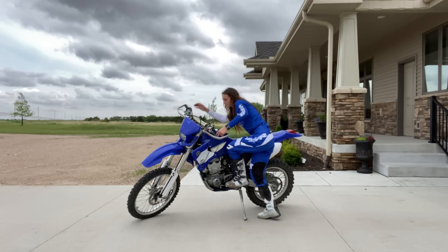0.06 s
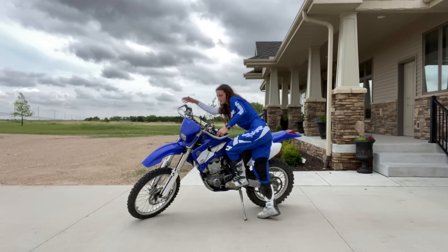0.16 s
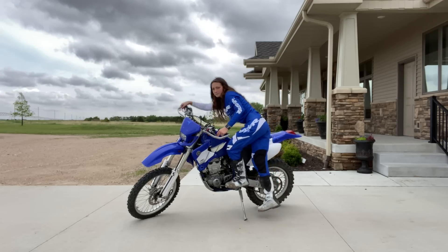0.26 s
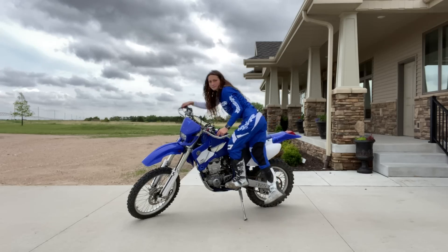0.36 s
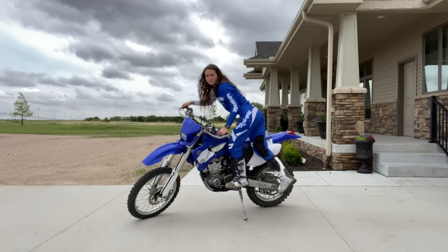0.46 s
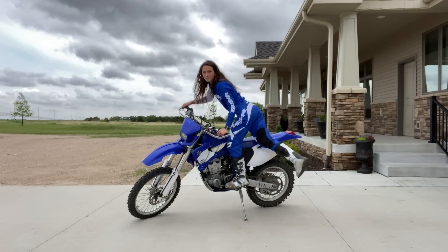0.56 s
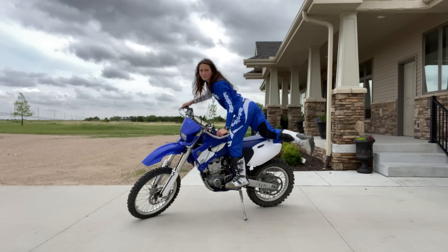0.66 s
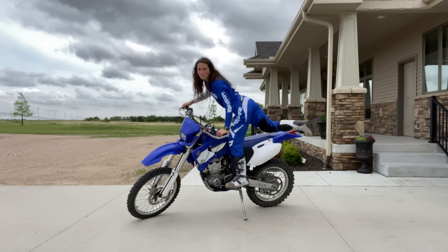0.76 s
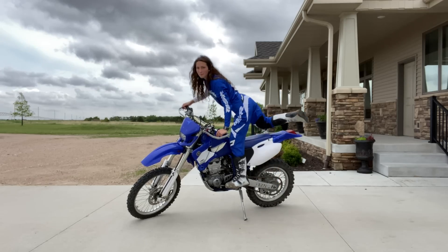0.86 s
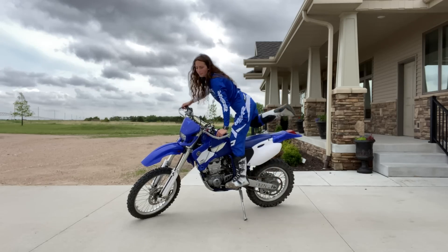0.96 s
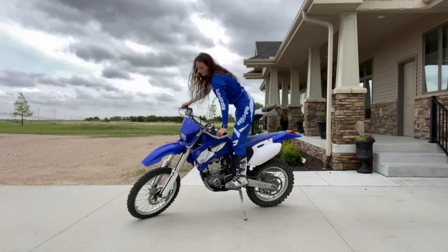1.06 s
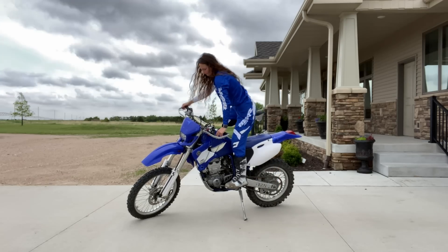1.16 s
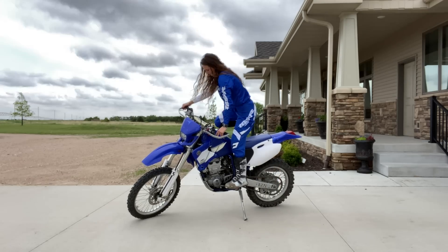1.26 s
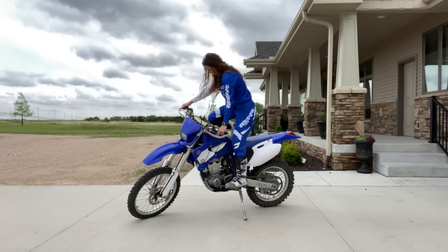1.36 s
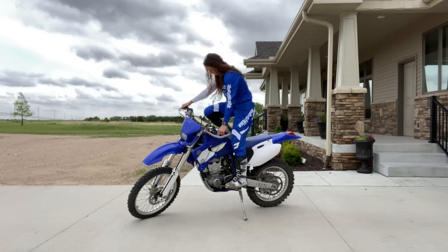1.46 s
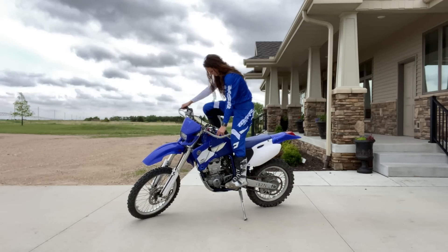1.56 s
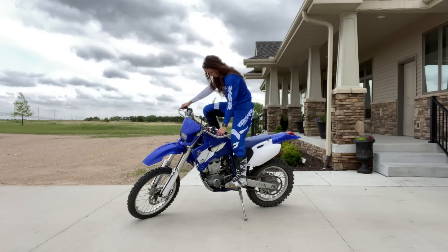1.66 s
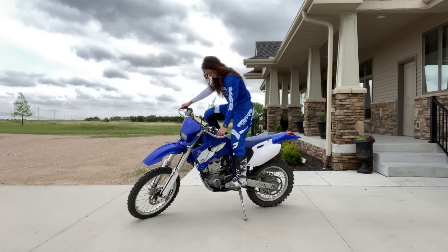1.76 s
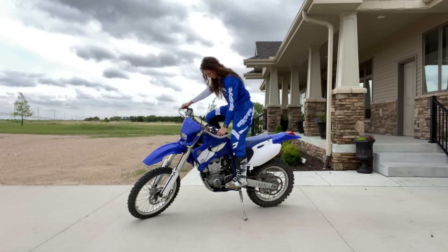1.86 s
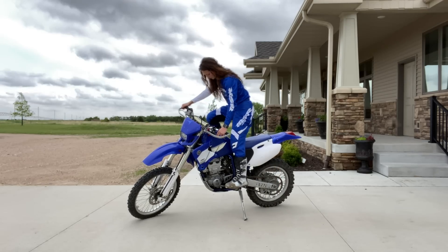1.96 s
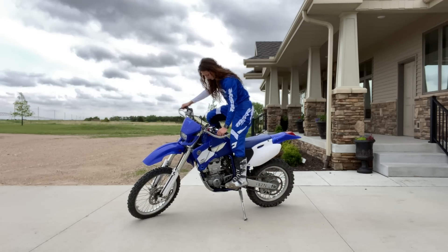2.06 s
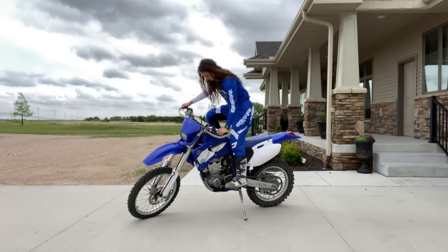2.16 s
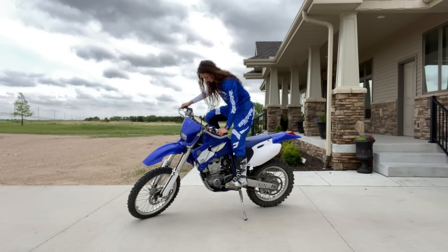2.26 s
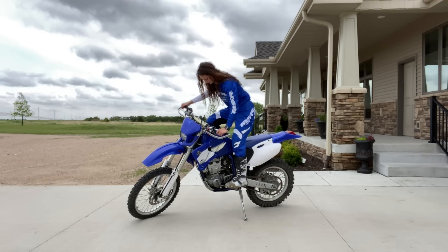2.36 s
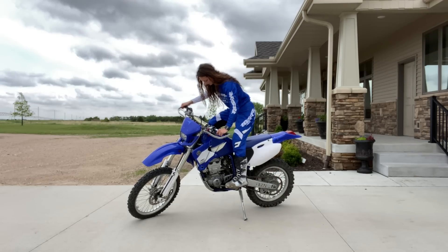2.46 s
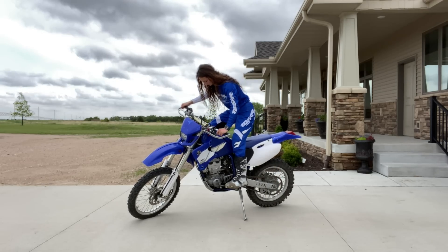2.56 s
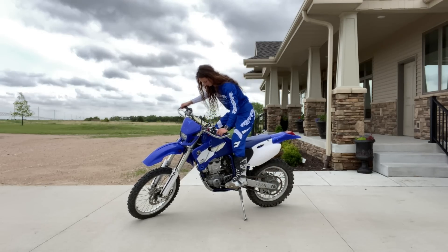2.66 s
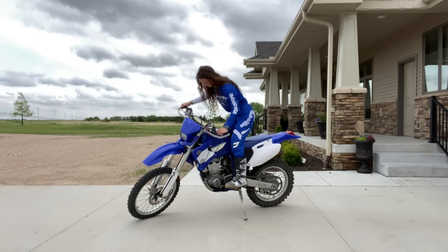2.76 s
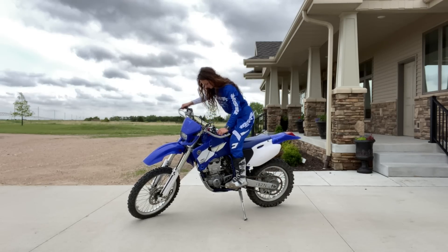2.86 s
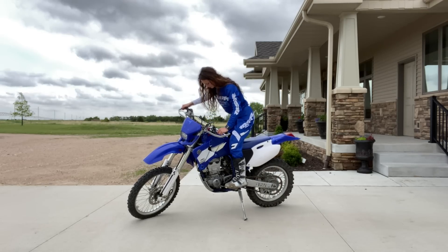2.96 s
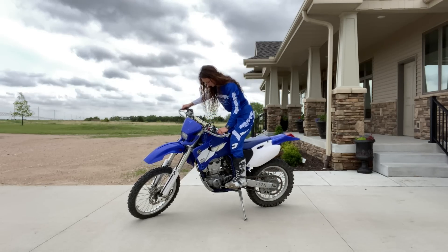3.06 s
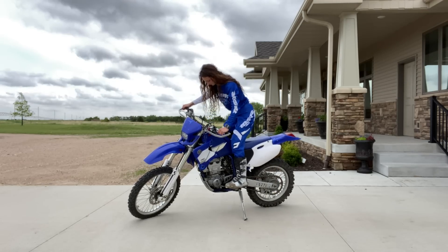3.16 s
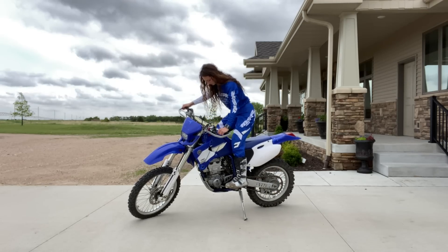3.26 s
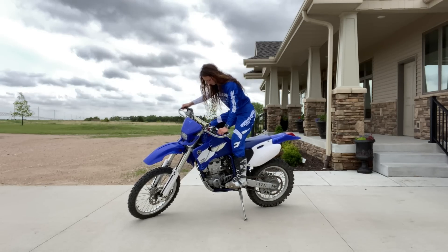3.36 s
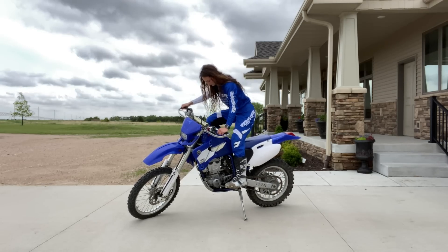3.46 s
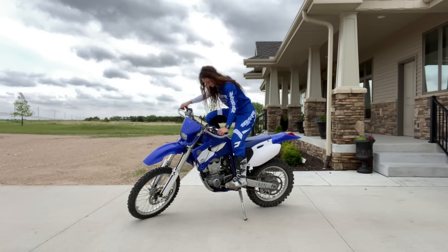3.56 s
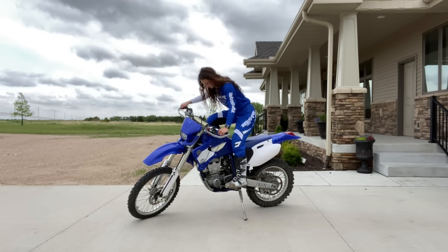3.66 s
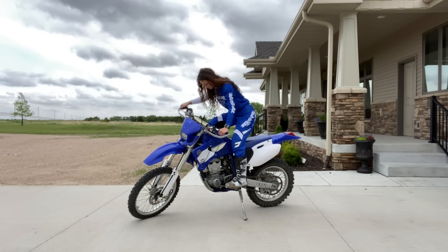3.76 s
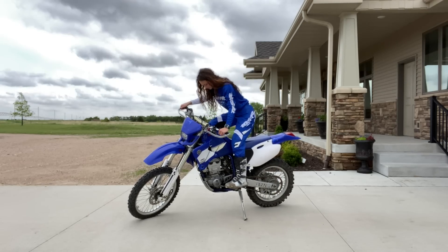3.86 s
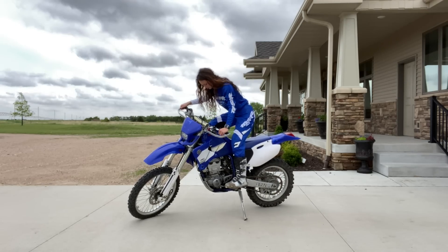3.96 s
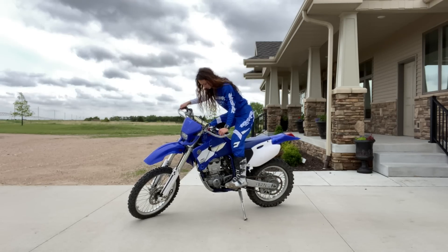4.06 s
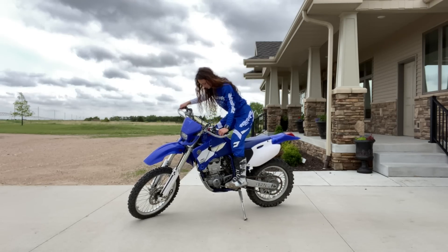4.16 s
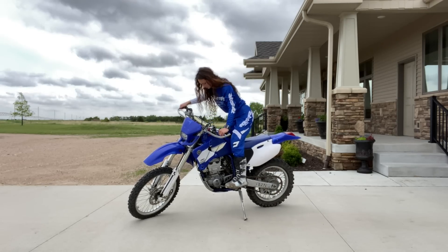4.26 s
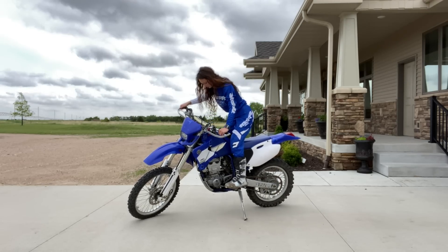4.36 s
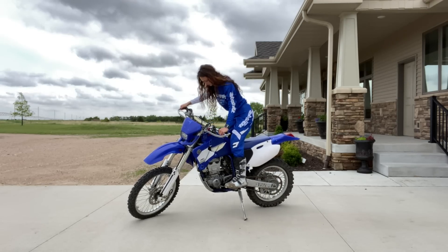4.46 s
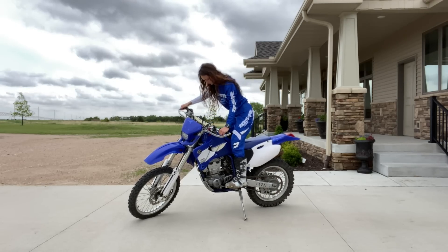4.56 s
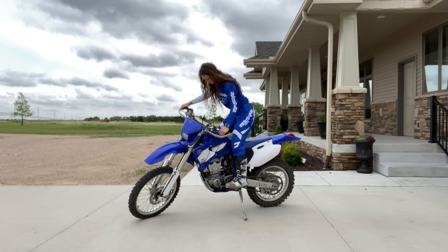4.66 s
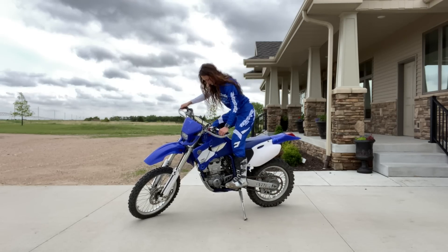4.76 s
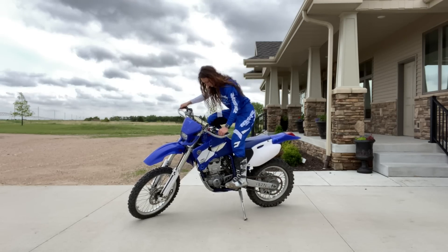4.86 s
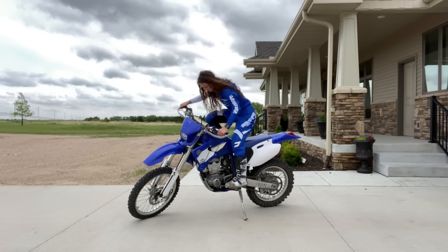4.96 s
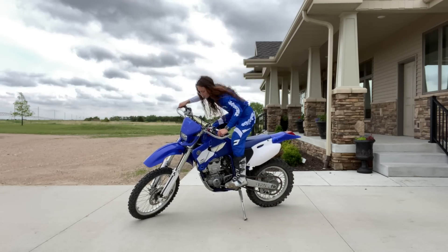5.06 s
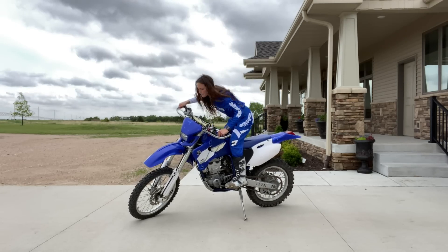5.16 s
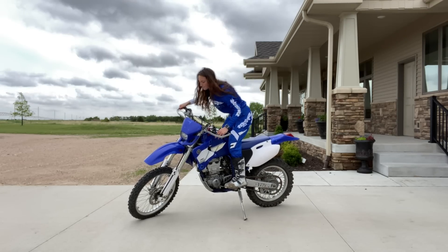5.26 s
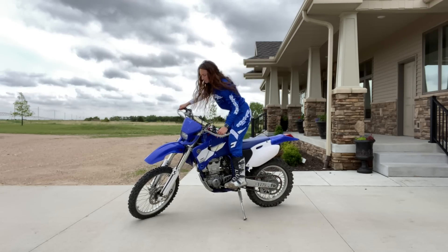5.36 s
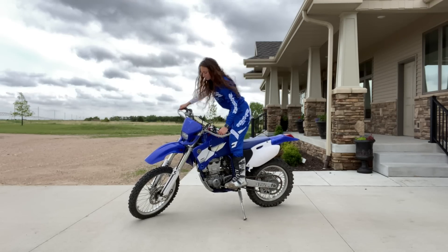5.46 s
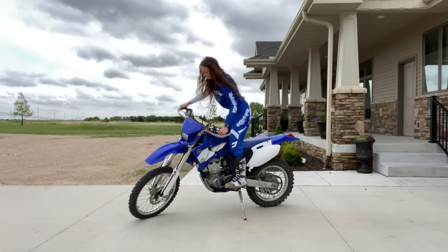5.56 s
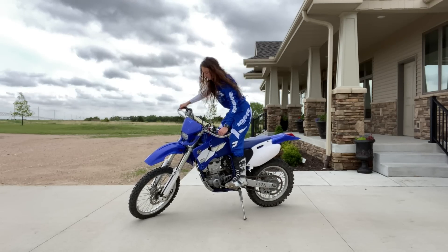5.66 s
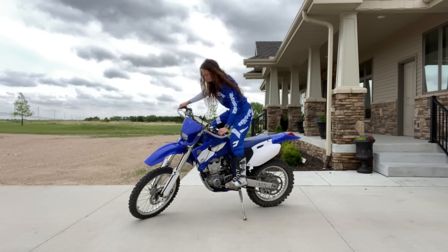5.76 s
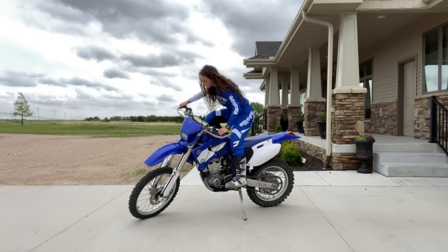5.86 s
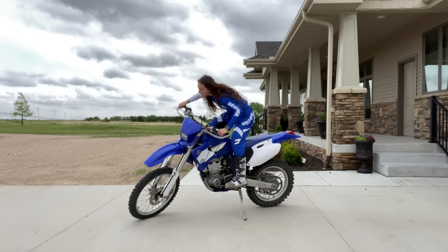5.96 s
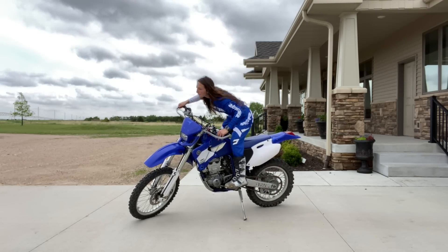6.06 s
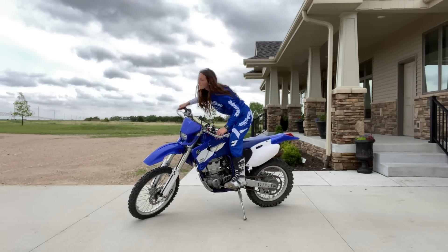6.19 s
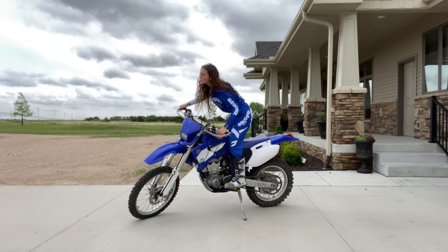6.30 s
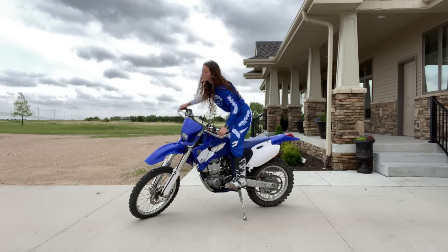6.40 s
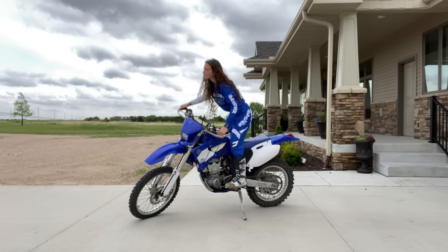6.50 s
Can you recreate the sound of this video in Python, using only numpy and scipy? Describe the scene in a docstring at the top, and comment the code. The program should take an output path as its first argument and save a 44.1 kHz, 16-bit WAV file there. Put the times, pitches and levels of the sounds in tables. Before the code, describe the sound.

A dirt bike's kick-starter is ratcheted and stamped four times beside a house, clanking and whirring without firing, over faint breeze.

```python
"""Dirt bike that will not start

A four-stroke dirt bike is kicked over four times on a driveway beside a house and never fires.
Each kick whirrs the gears (grains and noise), puffs air through the engine (a gliding hollow note) and
clanks the lever on its stop (cracks ringing modes). The lever scrapes out on its pivot and ratchets as
it rises. Riding gear rustles and squeaks, a breeze rumbles (shaped noise), and the house echoes the bike."""
import sys
import numpy as np
from scipy import signal
from scipy.fft import rfft, irfft
from scipy.io import wavfile
from scipy.ndimage import uniform_filter1d

SR = 44100
rng = np.random.default_rng(int(sys.argv[2]) if len(sys.argv) > 2 else 0)


def transcribe(u):
    """Save the signal u as a 16-bit wav file named by the first command-line argument.

    u: samples, shape (n,) or (channels, n), limited to [-1, 1]; the rate is SR.
    q: integer samples, one column per channel.
    """
    v = np.clip(np.atleast_2d(u).T, -1, 1)
    q = np.round(v * 32767).astype(np.int16)
    wavfile.write(sys.argv[1], SR, q)


N = 287973  # length in samples

# Table and setting levels are relative: layers add their own trims, and treble is scaled by "brighten".
# each kick, timed where the lever hits its stop: t/s, run-up/s, push/s, pumping level/dB, gears level/dB,
# clank level/dB, clank treble/dB, return spring level/dB
KICKS = [(2.8414, .13, 0.13, -46, -49.5, -15, -24, -67), (4.3128, 0.17, 0.07, -42, -45.5, -16, -19, -64),
         (5.198, 0.076, 0.15, -30.5, -41, -7.5, -7, -50.5),
         (6.13, 0.079, 0.15, -27.5, -40, -6.5, -12, -61.5)]
# the lever's faces chatter shut on the stop: delay t/s, level/dB
CLANK_CONTACTS = [(0, -7.5), (.0017, -1), (.0036, -5), (.0065, -12)]
# the pawl catches or slips over a tooth: t/s, level/dB, treble/dB, favoured ring f/Hz
RATCHET_TEETH = [(2.7682, -20.5, -5.5, 2570), (2.9023, -27, -18, 1890), (3.1711, -26, -18.5, 2460),
                 (3.2241, -26, -20.5, 1730), (3.2817, -26, -18.5, 1730), (3.3431, -27, -16.5, 2570),
                 (3.409, -26, -18.5, 1900), (3.479, -26, -18.5, 1850), (4.2547, -21.5, -9, 2440),
                 (4.4318, -25, -20.5, 1930), (4.4978, -24, -20, 1710), (4.5464, -24.5, -21, 1710),
                 (4.592, -25, -21.5, 1730), (4.6395, -24.5, -21, 2350), (4.6932, -25, -21.5, 1740),
                 (4.75, -25.5, -19, 1730), (4.8086, -25.5, -20.5, 2270), (4.8666, -24.5, -19, 2180),
                 (5.002, -18.5, -22, 1900), (5.148, -31.5, -13, 1260), (5.1624, -20, 0, 1208),
                 (5.6785, -25, -20, 2520), (5.7302, -24, -18, 1860), (5.7755, -25, -16.5, 1910),
                 (5.8179, -24, -14, 1910), (5.8612, -25, -18, 2200), (6.0936, -21, 2.5, 1260)]
# the lever rises over the ratchet: first tooth t/s, last tooth t/s, jingle level/dB
LEVER_LIFTS = [(3.142, 3.48, -58.5), (4.496, 4.87, -60), (5.69, 5.86, -47.5)]
# the boot eases the lever round to find compression: start t/s, end t/s, level/dB
LEVER_NUDGES = [(2.364, 2.437, -52), (3.516, 3.764, -61)]
# dull low thumps of frame, engine air and buffeting wind: t/s, level/dB, push length/s
LOW_THUMPS = [(0.793, -49, 0.005), (2.019, -41, 0.0072), (2.419, -36, 0.012), (2.502, -36.5, 0.012),
              (2.7, -37, 0.0056), (2.779, -29, 0.0078), (3.175, -41.5, 0.0023), (3.29, -44, .002),
              (3.45, -48, .002), (3.86, -37.5, 0.0086), (4.206, -36.5, 0.0033), (4.262, -24.5, 0.0053),
              (5.098, -17, 0.006), (5.111, -11, 0.0054), (5.153, -16.5, 0.0038), (5.26, -27.5, 0.0085),
              (5.999, -22.5, 0.0015), (6.07, -13.5, 0.0039), (6.094, -7.5, 0.0048), (6.431, -40.5, 0.0031)]
# boot and lever knock as they take up slack: t/s, level/dB, treble/dB
SLACK_KNOCKS = [(0.054, -46, 6), (2.292, -53.5, -24), (2.3625, -38, -53), (2.382, -39.5, -43),
                (2.422, -43.5, -42), (2.873, -35, -11), (3.547, -40.5, -45), (3.697, -37, -42),
                (4.186, -47.5, -16), (4.35, -32, -1), (4.923, -36.5, -5), (4.945, -39.5, -20),
                (5.031, -21.5, -17), (5.051, -32, -30), (5.289, -29, -15), (5.316, -25.5, -16),
                (5.956, -19.5, -21), (6.139, -21, -28), (6.186, -31, -12), (6.195, -33.5, -5),
                (6.211, -27.5, -18), (6.245, -33, -15), (6.408, -42, -48)]
# dull bumps of boot and weight, and the low-mid body and echo of the clanks:
# t/s, level/dB, treble/dB, favoured ring f/Hz
DULL_BUMPS = [(.075, -55, -29, 330), (.102, -50.5, -17, 378), (1.113, -45, -36, 190),
              (1.138, -48.5, -30, 208), (2.382, -45.5, -21, 202), (3.568, -48.5, -28, 303),
              (3.712, -38, -22, 225), (3.738, -40, -4, 170), (4.207, -38.5, -17, 228),
              (4.316, -25, -21, 760), (5.217, -26, -21, 544), (5.937, -34.5, -17.5, 332),
              (6.15, -29, -19, 524)]
# buckles and controls tick: t/s, level/dB, treble/dB
BUCKLE_TICKS = [(0.0172, -51, 12), (0.2023, -28, 7.5), (0.2192, -36.5, 1), (0.342, -65, -22),
                (0.424, -54.5, -21), (0.66, -55.5, -17), (0.691, -56.5, -31), (0.715, -54, -36),
                (0.7638, -51.5, -41), (0.798, -49.5, -23), (0.831, -49, -24), (0.8812, -46, -21),
                (0.944, -52, -6), (0.9997, -46, -15), (1.045, -47, -16), (1.212, -53, -17),
                (1.2815, -64, -32), (1.474, -64, -9), (1.5165, -61, -18), (1.5543, -56.5, -19),
                (1.5817, -60, -26), (1.6484, -55, -28), (1.723, -55.5, -30), (1.861, -69, -40),
                (1.8921, -54, -36), (1.911, -56.5, -40), (1.9824, -65, -28), (2.3065, -42, -29.5),
                (3.0572, -46.5, -16), (3.1327, -45.5, -29), (3.639, -43.5, -35)]
# the boot sole squeaks on the lever: t/s, length/s, pitch f/Hz, level/dB
SOLE_SQUEAKS = [(4.004, 0.039, 1020, -60), (4.028, 0.034, 993, -55), (4.061, .013, 1495, -53.5),
                (6.491, 0.02, 3700, -60.5)]
# the rider swings a leg over and settles: t/s, rustle level/dB
RUSTLE_CURVE = [(0, -54), (.16, -56.5), (.3, -64), (.43, -61), (.56, -66), (.7, -58.5), (.9, -61.5),
                (1.05, -56.5), (1.38, -63.5), (1.6, -76), (1.8, -93)]
# strength of the breeze: t/s, level/dB
BREEZE_CURVE = [(0, -56.5), (0.299, -62.5), (1.299, -61.5), (1.9, -60), (2.6, -50.5), (3.3, -52),
                (3.9, -48.5), (4.1, -54.5), (4.5, -48.5), (4.9, -59), (5.3, -42.5), (5.7, -53), (6.1, -45),
                (6.53, -54)]

# Resonances: f/Hz, level/dB, t60/s
# lever and crankcase
LEVER_MODES = [(540, -18, 0.065), (667, -12, 0.057), (1202, -7.5, 0.037), (1414, -5, 0.026),
               (1740, 1, .025), (1925, -0.5, 0.039), (2077, -4, 0.026), (2220, -10, .022),
               (2524, 2.5, 0.03), (2645, -6, 0.03), (3495, -7.5, .026), (4137, -7, 0.012),
               (4340, -6, 0.026), (8020, -13, 0.013)]
# ratchet and side cover
PAWL_MODES = [(589, -13, 0.04), (1135, -4, 0.049), (1419, -4, 0.034), (1697, 1.5, 0.031), (1937, -8, 0.024),
              (2411, -1, 0.038), (2900, -2, 0.023), (3664, -9.5, 0.027), (4480, -10.5, 0.055),
              (6720, -11.5, 0.036)]
# footpeg and frame
FRAME_MODES = [(320, -16, 0.069), (458, -11.5, 0.06), (615, -8, 0.033), (990, -8, 0.057),
               (1155, 4.5, 0.035), (1330, -3.5, 0.026), (1727, -0.5, 0.019)]
# coils of the return spring
SPRING_MODES = [(1157, -8, 1.2), (1453, -2, 2.4), (1482, -9, 2), (1620, -3, 2.4), (1674, -10, 2),
                (2406, -10, 1.3), (2546, -9, 1.1), (2880, -5, 1.3), (3080, -7, .9), (3289, -12, 2)]
# low notes of airbox, exhaust and frame
PIPE_MODES = [(59.7, 9.5, 0.19), (85.4, 2.5, 0.15), (123.5, -3, 0.45), (199.7, -6, 0.19), (280, -14, 0.17)]
# hollow note of a puff of air and its overtones: multiple of the pitch, level/dB
GULP_OVERTONES = [(1, 1), (2.3, -14.5), (3.9, -18)]

# Noise colours: f/Hz, level/dB
# crack of the lever on its stop
CLANK_COLOUR = [(150, -30.5), (250, -13), (600, -10.5), (922, -9), (1250, -6), (1950, -1.5), (2280, -2.5),
                (2570, -5), (3060, -8), (3400, -6.5), (4730, -11.5), (7840, -4), (9490, -10.5),
                (13200, -11.5), (16000, -28)]
# crack of the pawl, also the linkage jingle
PAWL_COLOUR = [(240, -41), (400, -21), (1710, -9), (2090, -11), (2430, -9), (2750, -11.5), (3810, -11),
               (6150, -15.5), (8110, -13.5), (9320, -14), (11900, -13.5), (16000, -24)]
# knocks of boot and lever
KNOCK_COLOUR = [(88, -34.5), (150, 0.5), (395, -6.5), (844, -11.5), (1140, -5.5), (2350, -16.5),
                (3070, -17), (4080, -22.5), (7920, -26.5), (9220, -28), (14000, -34)]
# dull low-mid bumps
BUMP_COLOUR = [(100, -23), (170, 6), (300, -4.5), (520, -8), (800, -19), (1250, -14), (3000, -29),
               (12000, -48)]
# ticks of buckles and controls
TICK_COLOUR = [(300, 0.5), (700, -25), (1150, 4.5), (1900, -10.5), (2600, -4), (4000, -13.5), (6000, -15.5),
               (8300, -10.5), (11000, -20), (16000, -29)]
# scrape of gears and cam chain
GEAR_COLOUR = [(400, -18), (800, -6), (1180, 5), (1400, 0.5), (1750, 3.5), (2100, -5), (2500, 4),
               (4000, -3), (6300, -5.5), (8100, -2), (12000, -16), (16000, -20)]
# rumble of the engine case
CASE_COLOUR = [(200, -3.5), (300, -1.5), (400, 0.5), (540, -3), (660, -16.5), (820, -7), (1200, -43)]
# air churning in the pipes
PUMP_COLOUR = [(45, -26), (65, -6), (98, -13.5), (112, -3), (122, -3), (134, -6.5), (160, -14.5), (198, 3),
               (245, -12.5), (283, -7.5), (400, -25.5), (600, -52.5)]
# hollow metallic chatter as the engine rocks back
RECOIL_COLOUR = [(800, -16), (1170, -1), (1330, -19), (1480, -9), (1760, 5.5), (2050, -14), (2600, -9),
                 (3080, -0.5), (3500, -28), (7000, -39)]
# friction of the dry pivot
PIVOT_COLOUR = [(500, -36), (1150, -6.5), (1850, -17), (2300, 2.5), (2900, -11), (3570, -10.5),
                (6500, -17.5), (7700, -13), (10300, -22), (14000, -29)]
# fabric, also the scuff of the boot sole
CLOTH_COLOUR = [(250, -3.5), (700, -20.5), (950, -7), (1250, -6), (1900, -13), (2550, -9), (5000, -17.5),
                (8200, -15), (13000, -19), (16000, -25)]
# rumble of the breeze
WIND_COLOUR = [(12, -28), (20, -7.5), (75, -2), (145, -11.5), (184, -13), (207, -25.5), (505, -41.5),
               (612, -52), (700, -41), (910, -67.5), (1540, -120)]
# open-air hiss
AIR_COLOUR = [(100, -8), (300, -18), (700, -22), (1400, -21.5), (4000, -33), (8500, -34), (14000, -37)]

# scattered echoes from wall and porch: delay t/s, level/dB, smear/s
ECHOES = [(0.017, -13, 0.0016), (0.021, -15, 0.0064), (.036, -22, .003), (0.0594, -21.5, 0.0024)]
# phase by which the left microphone port leads at bearing 1: f/Hz, phase/rad
PORT_PHASE = [(20, 0), (700, 1.42), (1900, 1.39), (4000, 2.5), (6200, 2.5), (7700, 9.5), (8600, 7),
              (10300, 8), (12900, -2.5), (15000, -16)]
# treble notches of the microphone ports: f/Hz, level/dB
PORT_COLOUR = [(6800, 0), (8100, -2.5), (8800, -1.5), (9350, -22), (10000, -9.5), (10700, -1.5),
               (13300, -8.5), (14600, -4), (16000, -12)]

# the engine spins up from near rest, gains a little under the leg and coasts down after the stop
REST_DB, BUILD_DB, COAST_DB_PER_S = -71, 4, 101
# the rising lever drags the gears along lightly and shakes the linkage
DRAG_PUMP_DB, DRAG_CASE_DB, DRAG_GEARS_DB = -55, -60.5, -59.5
JINGLE_BUILD_DB, JINGLE_RISE_DB_PER_S, JINGLE_FALL_DB_PER_S = 11, 1400, 107
NUDGE_RISE_DB_PER_S, NUDGE_FALL_DB_PER_S = 299, 135
JOLT_DB, JOLT_PUSH_S = -19.5, 0.0067  # every clank also jolts the frame; level relative to the clank
# after the third kick the engine rocks back with a hollow metallic chatter
RECOIL_START_S, RECOIL_END_S, RECOIL_DB = 5.305, 5.34, -32.5
RECOIL_RISE_DB_PER_S, RECOIL_FALL_DB_PER_S = 417, 292
RING_LIFT_DB, RING_OCTAVES = 4, 0.25  # boost at a favoured pitch, and its reach to each side
# the hollow note sinks through the push and climbs as the engine rebounds
GULP_START_HZ, GULP_LOW_HZ, GULP_END_HZ, GULP_REBOUND_S, GULP_DB = 290.8, 120.1, 330, 0.161, -8.5
PUFFS_PER_S, PUFF_T60_S = 75, 0.062
# the lever swings out on its dry pivot, sticking and slipping ever more slowly
PIVOT_START_S, PIVOT_END_S, PIVOT_DB, PIVOT_FIRST_HZ, PIVOT_LAST_HZ = 2.149, 2.206, -54.5, 230, 84.7
WALL_S, WALL_DB = 0.0175, -10
PORCH_DB, PORCH_T60_S = -18.5, 0.23
AIR_DB = -73.5
TOP_HZ = 16000


def clanks(gain_db=-2.5, ring_db=-2.0, crack_s=0.0009, rattle_db=-22, rattle_s=0.03,
           brighten=0.39, lead_s=0.001):
    """The lever hits its stop in a cluster of cracks that ring the crankcase; loose parts rattle on."""
    out, t = np.zeros(N), np.arange(2 ** 14) / SR
    usual = np.median([kick[6] for kick in KICKS])
    contacts = sum(undb(db) * (t >= s) * np.exp(-np.abs(t - s) / crack_s) for s, db in CLANK_CONTACTS)
    hardest_s = max(CLANK_CONTACTS, key=lambda row: row[1])[0]
    for stop_s, *_, db, treble, _ in KICKS:
        rattle = chatter(rate=150, spread=5, hiss_db=-12, grain_s=0.002)[:len(t)]
        rattle = rattle * undb(rattle_db) * np.exp(-t / rattle_s)
        crack = even(rng.standard_normal(len(t)) * contacts + rattle)
        crack = colour(crack, CLANK_COLOUR)
        crack = colour(crack, [(2500, 0), (7000, brighten * (treble - usual))])
        crack = crack * (t < t[-1] / 2)  # keep only the first half
        # the ring swells up around the hardest contact
        body = ring(LEVER_MODES, t, scatter_db=1, detune=0.006) * (1 - np.exp(-(t / hardest_s) ** 2))
        clank = peak_unit(crack) + undb(ring_db) * peak_unit(body)
        add(out, stop_s - lead_s, undb(db + gain_db) * peak_unit(clank))
    return out


def spring():
    """The return spring sings on for a second after each clank; close modes of its coils beat."""
    out, t = np.zeros(N), np.arange(SR) / SR
    for s, *_, db in KICKS:
        coils = ring(SPRING_MODES, t, scatter_db=1, detune=0.0005)
        add(out, s, undb(db) * peak_unit(coils, size=2205))
    return out


def thumps(gain_db=0):
    """Frame, engine air or buffeting wind: a smooth push swings low resonances; longer is deeper."""
    out, t = np.zeros(N), np.arange(SR // 2) / SR
    column = sum(undb(db) * decay(t, t60) * np.cos(2 * np.pi * hz * t) for hz, db, t60 in PIPE_MODES)
    jolts = [(stop_s, clank_db + JOLT_DB, JOLT_PUSH_S) for stop_s, *_, clank_db, _, _ in KICKS]
    for s, db, push_s in LOW_THUMPS + jolts:
        push = np.sin(np.pi * np.minimum(t / push_s, 1)) ** 2
        swing = signal.fftconvolve(push, column)[:len(t)]
        add(out, s, -undb(db + gain_db) * peak_unit(swing))
    return out


def gulps(waver=0.079, flutter_db=3.5):
    """Air gurgles through the engine in uneven puffs; the hollow note they ring moves with the stroke."""
    out, t = np.zeros(N), np.arange(SR // 10) / SR
    glide_hz = [GULP_START_HZ, GULP_LOW_HZ, GULP_LOW_HZ, GULP_END_HZ]
    for kick in KICKS:
        stop_s, _, push_s, db = kick[:4]
        glide_s = [-push_s - 0.04, -0.05, 0.04, GULP_REBOUND_S]
        puffs = np.zeros(N)
        # one second of puffs, centred on the stop
        for k, (late, pitch, size) in enumerate(rng.uniform(-1.016, 1, (int(PUFFS_PER_S), 3))):
            s = (k + late / 2) / PUFFS_PER_S - 0.5
            hz = np.interp(s, glide_s, glide_hz) * (1 + waver * pitch)
            note = sum(undb(gain) * np.sin(2 * np.pi * multiple * hz * t)
                       for multiple, gain in GULP_OVERTONES)
            add(puffs, stop_s + s, undb(2 * flutter_db * size) * note * decay(t, PUFF_T60_S))
        out += spin(kick, db + GULP_DB, lash_db=-2.5) * puffs / np.sqrt(np.sum(puffs ** 2) / SR)
    return out


def cranking(pump_db=-4, case_db=-3.5, whirr_db=-2.0, patchy_db=2.0, nudge_whirr_db=-7):
    """As the engine turns, air churns in the pipes, the case rumbles, gears and cam chain scrape."""
    drag = sum(swell(*lift[:2], 0, JINGLE_RISE_DB_PER_S, NUDGE_FALL_DB_PER_S) for lift in LEVER_LIFTS)
    nudge = sum(swell(*row, NUDGE_RISE_DB_PER_S, NUDGE_FALL_DB_PER_S) for row in LEVER_NUDGES)
    pump = sum(spin(kick, kick[3], lash_db=-1.5) for kick in KICKS)
    pump = pump + undb(DRAG_PUMP_DB) * drag + nudge
    case = sum(spin(kick, kick[4], lash_db=3.5) for kick in KICKS)
    case = case + undb(DRAG_CASE_DB) * drag + nudge
    whirr = sum(spin(kick, kick[4], lash_db=4.0) for kick in KICKS)
    whirr = whirr + undb(DRAG_GEARS_DB) * drag + undb(nudge_whirr_db) * nudge

    air = unit(colour(rng.standard_normal(N), PUMP_COLOUR))
    air = air / np.sqrt(uniform_filter1d(air ** 2, size=1323))  # the flow is as steady as the leg's push
    teeth = chatter(rate=190, spread=5.3, hiss_db=-2.0, grain_s=0.0055) * undb(patchy_db * walk(70))
    scrape = grains(rate=1300, low_hz=550, high_hz=3800, spread=2.8, cycles=4)
    scrape = scrape + undb(-4) * unit(teeth)
    churn = undb(pump_db) * pump * air
    rumble = undb(case_db) * case * unit(colour(teeth, CASE_COLOUR))
    return churn + rumble + undb(whirr_db) * whirr * unit(colour(scrape, GEAR_COLOUR))


def ratchet():
    """The pawl clicks over ratchet teeth, ringing the side cover."""
    return blows(RATCHET_TEETH, PAWL_MODES, PAWL_COLOUR, gain_db=-6.5, ring_db=-3.5, rise_s=0.0023,
                 crack_s=0.0027, rattle_db=-20.0, rattle_s=0.025, lead_s=0.0012, brighten=1.9,
                 detune=0.044)


def loose_parts(shaken_db=-13, linger_db=-58, linger_db_per_s=45):
    """Chain and linkage chatter on the recoil, under each kick and as the lever comes back up."""
    hollow = unit(colour(chatter(rate=260, spread=2.0, hiss_db=-3, grain_s=0.0026), RECOIL_COLOUR))
    jingle = unit(colour(chatter(rate=450, spread=4.3, hiss_db=0, grain_s=0.003), PAWL_COLOUR))
    rising = sum(swell(*lift, JINGLE_RISE_DB_PER_S, JINGLE_FALL_DB_PER_S, JINGLE_BUILD_DB)
                 for lift in LEVER_LIFTS)
    shaken = undb(shaken_db) * sum(spin(kick, kick[4], lash_db=5) for kick in KICKS)
    # a burst and a faint tail
    stages = [(RECOIL_DB, RECOIL_FALL_DB_PER_S), (linger_db, linger_db_per_s)]
    recoil = sum(swell(RECOIL_START_S, RECOIL_END_S, db, RECOIL_RISE_DB_PER_S, fall)
                 for db, fall in stages)
    return hollow * recoil + jingle * (rising + shaken)


def knocks():
    """Boot and lever take up slack and knock the footpeg and frame modes."""
    return blows(SLACK_KNOCKS, FRAME_MODES, KNOCK_COLOUR, gain_db=-3.0, ring_db=-1.0, rise_s=0.0041,
                 crack_s=0.0042, rattle_db=-17.0, rattle_s=0.023, lead_s=0.0015, brighten=0.67,
                 detune=0.016)


def bumps():
    """Dull bumps of boot and weight, and the low-mid body and echo of the clanks: long, little ring."""
    return blows(DULL_BUMPS, FRAME_MODES, BUMP_COLOUR, gain_db=0.0, ring_db=-12.0, rise_s=0.0037,
                 crack_s=0.019, rattle_db=-28, rattle_s=0.023, lead_s=0.00239, brighten=0.75,
                 detune=0.042)


def ticks():
    """Buckles and controls tick with a fast rise and freely scattered small metal modes."""
    return blows(BUCKLE_TICKS, PAWL_MODES, TICK_COLOUR, gain_db=-4.0, ring_db=-7.5, rise_s=0.00072,
                 crack_s=0.0051, rattle_db=-13, rattle_s=0.016, lead_s=0.0006, brighten=0.8,
                 detune=0.075)


def pivot(slip_share=1.0, rise_db_per_s=1100, fall_db_per_s=1500):
    """The lever scrapes as it is folded out: a burst of friction at every slip."""
    hz = np.interp(np.arange(N) / SR, [PIVOT_START_S, PIVOT_END_S], [PIVOT_FIRST_HZ, PIVOT_LAST_HZ])
    phase = np.cumsum(hz * (1 + 0.1 * walk(100))) / SR % 1
    slips = unit(colour(np.exp(-phase / slip_share) * rng.standard_normal(N), PIVOT_COLOUR))
    return slips * swell(PIVOT_START_S, PIVOT_END_S, PIVOT_DB, rise_db_per_s, fall_db_per_s)


def squeaks(waver=0.041, overtone_db=-13, scuff_db=-3):
    """Rubber grips and slides on metal: short wavering notes over a scuff."""
    out = np.zeros(N)
    for s, length_s, hz, db in SOLE_SQUEAKS:
        n = int(length_s * SR)
        phase = 2 * np.pi * np.cumsum(hz * (1 + waver * walk(400)[:n])) / SR
        scuff = unit(colour(rng.standard_normal(n), CLOTH_COLOUR))
        note = unit(np.sin(phase) + undb(overtone_db) * np.sin(2 * phase))
        add(out, s, undb(db) * (note + undb(scuff_db) * scuff) * signal.windows.tukey(n))
    return out


def clothes(gain_db=-3, patchy_db=1.5):
    """Stiff fabric and boots crease and slide over the seat in many small contacts."""
    creases = chatter(rate=320, spread=4.2, hiss_db=-0.5, grain_s=0.0027) * undb(patchy_db * walk(20.65))
    return undb(gain_db) * fader(*np.transpose(RUSTLE_CURVE)) * unit(colour(creases, CLOTH_COLOUR))


def wall(x, smear_s=0.0012):
    """The house front throws the sound back once, roughened by its stonework."""
    t = np.arange(2 ** 11) / SR
    stones = even(rng.standard_normal(len(t)) * (t >= WALL_S) * np.exp(-np.abs(t - WALL_S) / smear_s))
    sent = colour(x, [(70, -13.0), (300, -6.5), (560, 13), (1500, -8.5), (4000, 5), (9000, 3.0)])
    return undb(WALL_DB) * signal.fftconvolve(sent, stones)[:N]


def house(x, ground_db=-15, ground_s=0.0018, bass_db=-7, apart_hz=600):
    """The ground scatters at once, stonework and steps a little later; porch pillars add a short tail."""
    t = np.arange(SR // 2) / SR

    def patch(delay_s, db, smear_s):
        """One scattered reflection, more alike at the two ports in the bass."""
        mid, side = rng.standard_normal((2, len(t)))
        side = colour(side, [(apart_hz / 4, -7), (apart_hz, 3), (2 * apart_hz, 0)])
        burst = mid + side * np.array([[1], [-1]])
        burst = burst * (t >= delay_s) * np.exp(-np.abs(t - delay_s) / smear_s)
        return undb(db) * even(burst)

    ground = patch(0.00093, ground_db, ground_s)
    porch = patch(0.022, PORCH_DB, PORCH_T60_S / np.log(1000))
    response = ground + porch + sum(patch(*echo) for echo in ECHOES)
    sent = colour(x, [(150, bass_db), (500, 3.0), (1600, -2.5), (4000, 4.0), (12000, -5.7)])
    return signal.fftconvolve(sent[None], response, axes=1)[:, :N]


def outdoors(gain_db=-2, gust_db=4.0, side_db=-11):
    """A light breeze rumbles in gusts over faint open-air hiss."""
    mid, side = colour(rng.standard_normal((2, N)), WIND_COLOUR)
    wind = unit(mid + undb(side_db) * side * np.array([[1], [-1]]))
    wind = wind * undb(gain_db + gust_db * walk(11)) * fader(*np.transpose(BREEZE_CURVE))
    hiss = unit(colour(rng.standard_normal((2, N)), AIR_COLOUR))
    return wind + undb(AIR_DB) * hiss


def blows(rows, modes, noise, gain_db, ring_db, rise_s, crack_s, rattle_db, rattle_s, lead_s,
          brighten, detune):
    """Each blow grazes, bites a moment later to ring its modes, and leaves a brief rattle."""
    out, t = np.zeros(N), np.arange(2 ** 14) / SR
    usual = np.median([row[2] for row in rows])
    graze = 1 - np.exp(-(t / rise_s) ** 2)
    bite = 1 - np.exp(-(t / lead_s) ** 4)
    fade = np.exp(-t / crack_s) + undb(rattle_db) * np.exp(-t / rattle_s)
    for s, db, treble, *favoured in rows:
        tilt = brighten * (treble - usual)
        crack = colour(rng.standard_normal(len(t)), noise)
        crack = unit(colour(crack, [(2500, 0.0053), (7000, tilt), (13000, tilt)]))
        crack = peak_unit(crack * graze * fade)
        body = peak_unit(ring(modes, t, detune=detune) * bite)
        # a bright, glancing contact rings the body less
        blow = crack + undb(ring_db - 0.25 * max(tilt, 0)) * body
        for hz in favoured:
            reach = 2 ** RING_OCTAVES
            blow = colour(blow, [(hz / reach, 0), (hz, RING_LIFT_DB), (hz * reach, 0)])
            blow = blow * (t < t[-1] / 2)  # keep only the first half
        add(out, s - lead_s, undb(db + gain_db) * peak_unit(blow))
    return out


def ring(modes, t, scatter_db=2, detune=0.0035):
    """Decaying modes; every blow lands a little differently."""
    hz, db, t60 = np.transpose(modes)[:, :, None]
    size, pitch, phase = rng.standard_normal((3, len(modes), 1))
    tone = np.sin(2 * np.pi * (hz * (1 + detune * pitch) * t + phase))
    return np.sum(undb(db + scatter_db * size) * decay(t, t60) * tone, axis=0)


def chatter(rate, spread, hiss_db, grain_s):
    """Many small contacts of unequal size, each a brief burst, over a smooth hiss."""
    size = (rng.random(N) < rate / SR) * undb(spread * np.minimum(rng.exponential(size=N), np.pi))
    power = signal.lfilter([1], [1, -np.exp(-2 / (grain_s * SR))], size ** 2)
    return np.sqrt(power / power.mean() + undb(2 * hiss_db)) * rng.standard_normal(N)


def grains(rate, low_hz, high_hz, spread, cycles):
    """Tiny metal contacts at random moments, each a brief ring of its own pitch and size."""
    out, t = np.zeros(N), np.arange(2 ** 9) / SR
    for when, pitch, size in rng.random((int(rate * N / SR), 3)):
        hz = low_hz * (high_hz / low_hz) ** pitch
        gain = undb(spread * min(-np.log(1 - size), np.pi))
        add(out, when * N / SR, gain * np.exp(-t * hz / cycles) * np.sin(2 * np.pi * hz * t))
    return unit(out)


def spin(kick, db, lash_db):
    """Level of one kick: run-up, push, a step of lash_db as the load comes off, coast-down."""
    stop_s, run_up_s, push_s = kick[:3]
    t = np.arange(N) / SR - stop_s
    early = np.maximum(-t - push_s, 0) / run_up_s
    run_up = -max(db - REST_DB, 1) * early ** 2
    push = np.interp(t, [-push_s, 0], [0, BUILD_DB])
    return undb(db + run_up + push + (t > 0) * (lash_db - COAST_DB_PER_S * t))


def swell(start_s, end_s, db, rise, fall, build_db=0):
    """Gain that rises (dB per s), holds while building by build_db, and falls (dB per s)."""
    t = np.arange(N) / SR
    held = db + build_db * (np.interp(t, [start_s, end_s], [0, 1]) - 0.5)
    return undb(held - rise * np.maximum(start_s - t, 0) - fall * np.maximum(t - end_s, 0))


def fader(s, db):
    """Gain along a dB curve, silent outside it."""
    return undb(np.interp(np.arange(N) / SR, s, db, left=-200, right=-200))


def walk(rate):
    """Random levels held 1 / rate s and slewed twice; spread near 1."""
    k = int(SR / rate)
    steps = np.repeat(rng.standard_normal(N // k + 1), k)
    return unit(uniform_filter1d(uniform_filter1d(steps, k), k)[:N])


def decay(t, t60):
    """Exponential fade that loses 60 dB in t60 seconds."""
    return np.exp(-np.log(1000) * t / t60)


def on_bins(points, size):
    """A (f/Hz, value) table read at the bins of a spectrum."""
    hz, value = np.transpose(points)
    return np.interp(np.log(np.fft.rfftfreq(size, 1 / SR) + 1), np.log(hz), value)


def colour(x, points):
    """Filter by a (f/Hz, level/dB) table."""
    size = x.shape[-1]
    return irfft(rfft(x) * undb(on_bins(points, size)), size)


def even(burst):
    """Keep the phases of a scattered burst but make its spectrum flat; energy 1."""
    return irfft(np.exp(1j * np.angle(rfft(burst))), burst.shape[-1])


def undb(db):
    """Decibels to gain."""
    return 10 ** (np.asarray(db) / 20)


def unit(x):
    """Scale to rms 1."""
    return x / np.sqrt(np.mean(x ** 2))


def peak_unit(x, size=176):
    """Scale so that the loudest stretch of size samples has rms 1."""
    return x / np.sqrt(uniform_filter1d(x ** 2, size).max())


def add(track, s, sound):
    """Mix a sound into a track at time s."""
    i = max(int(s * SR), 0)
    track[i:i + len(sound)] += sound[:max(N - i, 0)]


def ports(x, bearing):
    """Spread a sound over two ports by phase; bearing > 0 is to the left."""
    lead = bearing * on_bins(PORT_PHASE, N) * np.array([[1], [-1]])
    return irfft(rfft(x) * np.exp(0.5j * lead), N)


def scene():
    """The bike stands a little to the left; the house front answers from the right."""
    engine = clanks() + spring() + thumps() + gulps() + cranking()
    contacts = ratchet() + loose_parts() + knocks() + bumps() + ticks()
    bike = engine + contacts + pivot() + squeaks() + clothes()
    return ports(bike, bearing=0.55) + ports(wall(bike), bearing=-1.62) + house(bike) + outdoors()


def record(dry):
    """The microphone ports notch the treble; deep bass is cut, loud peaks rounded, the top cut."""
    bass_cut = signal.butter(5, 43, "high", fs=SR, output="sos")
    sound = signal.sosfilt(bass_cut, colour(dry, PORT_COLOUR))
    sound = 0.95 * np.tanh(sound / 0.95)
    return signal.sosfilt(signal.ellip(8, 0.2, 70, TOP_HZ, fs=SR, output="sos"), sound)


dry = scene()
out = record(dry)
transcribe(out)
```